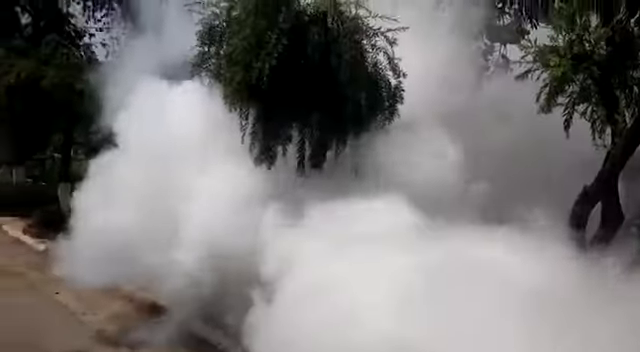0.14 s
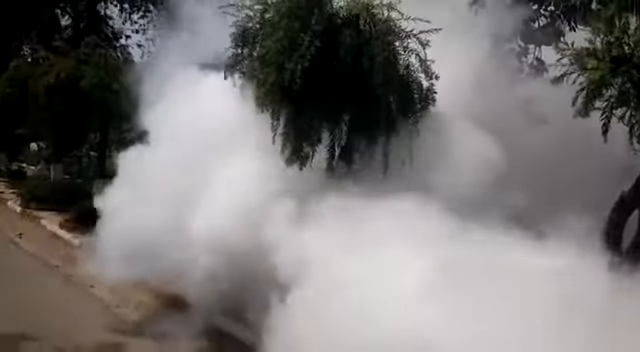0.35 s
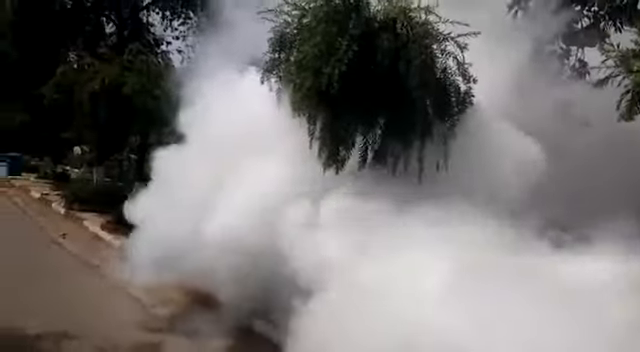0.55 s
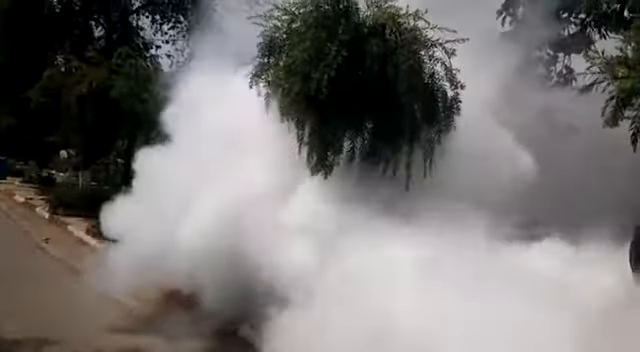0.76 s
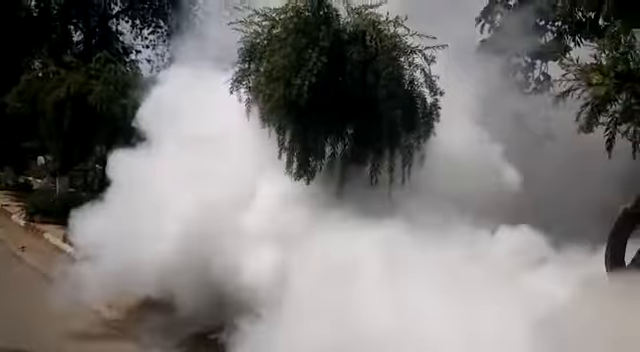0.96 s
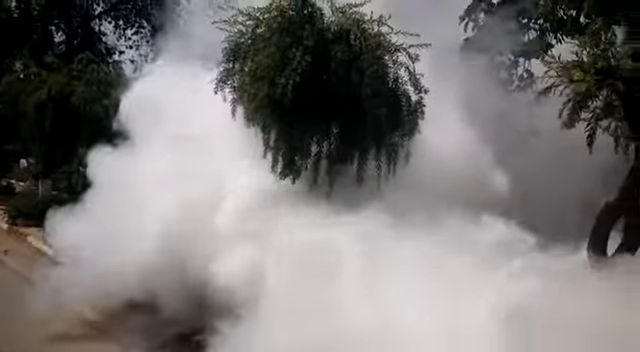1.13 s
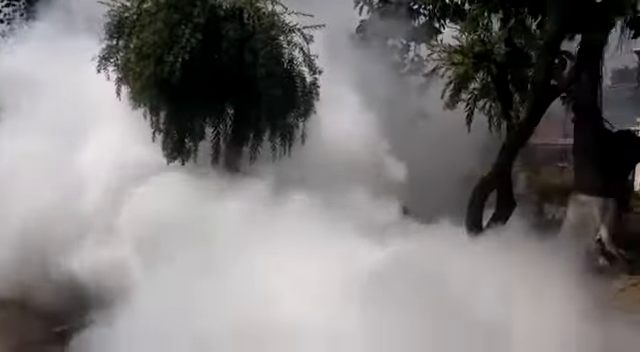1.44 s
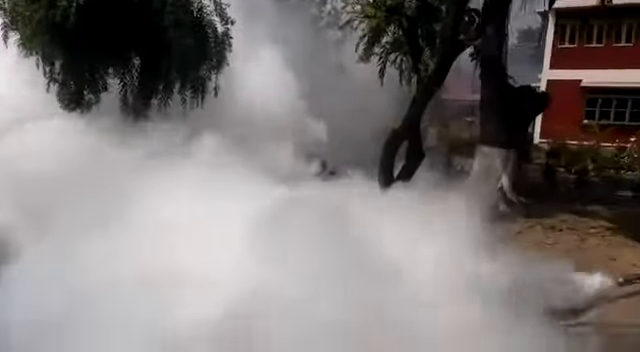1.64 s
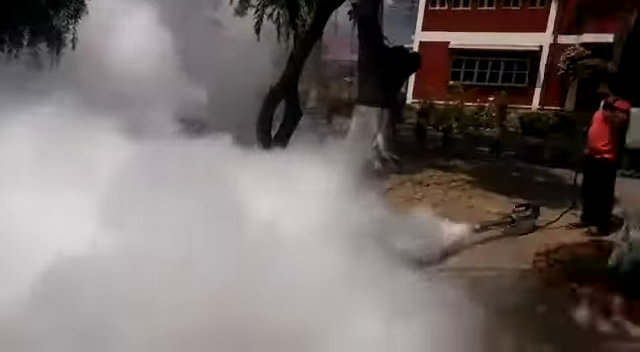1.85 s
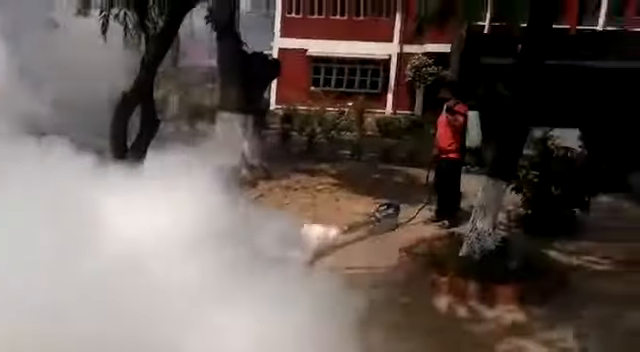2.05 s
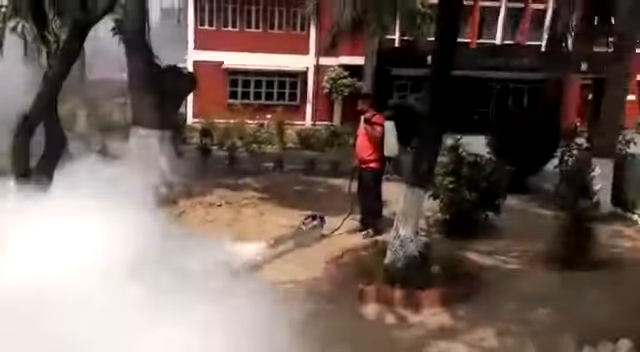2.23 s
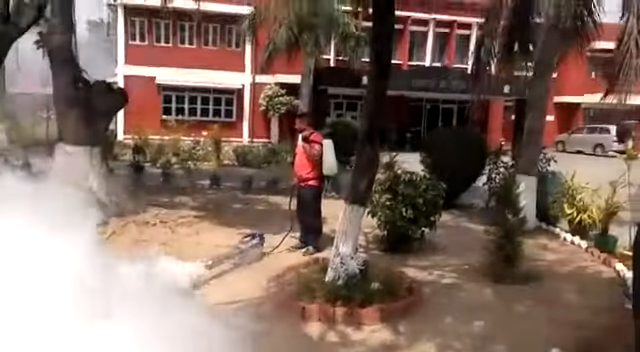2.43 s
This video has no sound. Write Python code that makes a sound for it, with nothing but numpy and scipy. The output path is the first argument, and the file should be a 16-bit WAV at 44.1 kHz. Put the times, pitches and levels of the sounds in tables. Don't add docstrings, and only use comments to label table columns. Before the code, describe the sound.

A pulse-jet fogger runs without pause some metres away in a garden, its rapid firings fusing into a rough low buzz with crackling gas and jet roar; a phone microphone catches it loud, compressed and dull on top.

```python
import sys
import numpy as np
from scipy import signal
from scipy.io import wavfile
from scipy.ndimage import uniform_filter1d, map_coordinates

SR = 44100
rng = np.random.default_rng(int(sys.argv[2]) if len(sys.argv) > 2 else 0)


def persist_wave(psi):
    counts = np.round(np.clip(psi, -1, 1) * 32767).astype(np.int16)
    wavfile.write(sys.argv[1], SR, np.atleast_2d(counts).T)


def natural_amplitude(level_db):
    exponent = np.asarray(level_db, float) / 20
    return 10 ** exponent


N = 114219


def level(x, db):
    return x * natural_amplitude(db) / np.sqrt(np.mean(x ** 2))


def band(x, hz, width_hz):
    return signal.lfilter(*signal.iirpeak(hz, hz / width_hz, fs=SR), x)


def lowpass(x, hz, order):
    run_in = 400
    x = np.concatenate([x[..., run_in:0:-1], x], -1)
    return signal.sosfilt(signal.butter(order, hz, fs=SR, output="sos"), x)[..., run_in:]


def walk(rate_hz):
    hold = int(SR / rate_hz)
    steps = np.repeat(rng.standard_normal(N // 100), hold)[:N + hold]
    return 1.3 * uniform_filter1d(uniform_filter1d(steps, hold), hold)[:N]


def control(index):
    # start_s, firing_rate_hz, bang_db, puff_facing_db, ground_lag_ms
    run = [(0, 104, -0.5, 1, .61), (0.199, 103.2, 1.5, 4.5, 0.6), (.4, 102.9, 2, 3, 0.56),
           (0.599, 103.3, -2, -4.5, .65), (0.721, 103.3, -0.5, 0, .69), (.85, 103.1, -2.5, 4.5, 0.67),
           (0.949, 103, -2, -1.5, 0.7), (1.148, 103.5, -4, 0, 0.72), (1.352, 103.9, -0.5, 1, .69),
           (1.52, 103.9, 1.5, -2, .69), (1.642, 102.4, -2.5, 0, 0.74), (1.851, 103.0, 1, -3, .62),
           (2.049, 103.7, 1, 6.5, 0.59), (2.202, 103.3, 2.5, 1, 0.54), (2.26, 105, 3.5, 4.5, .73),
           (2.451, 103.7, 2.5, 6.5, .7), (2.59, 105.2, 5.5, 6, 0.63)]
    return np.interp(np.arange(N) / SR, np.array(run)[:, 0], np.array(run)[:, index])


def firings():
    period_scatter, rate_wander, turns_per_size = 0.005, 0.003, -0.0054
    size_scatter_db, size_memory = 3.0, 0.16
    chance = rng.standard_normal((400, 4))
    even = np.cumsum(control(index=1) * (1 + rate_wander * walk(12))) / SR + 0.8
    slip = signal.lfilter([1], [1, -0.8], period_scatter * chance[:, 0] + turns_per_size * chance[:, 1])
    size_db = size_scatter_db * signal.lfilter([1], [1, -size_memory], chance[:, 1])
    return even + np.interp(even, np.arange(len(slip)), slip), size_db, chance


def roar():
    # centre_hz, level_db (per Hz)
    roar_spectrum = [(25, -47.5), (92, -32.5), (165, -25), (265, -11.5), (370, -14.5), (600, -7),
                     (1100, -18.5), (3000, -30.5)]
    roar_db, flicker_db = -24.5, 2.5
    centre_hz, spectrum_db = np.transpose(roar_spectrum)
    out = 0
    for hz in 28 * 2 ** np.arange(0, 6.8, 1 / 3):
        db = np.interp(np.log(hz), np.log(centre_hz), spectrum_db)
        noise = band(band(rng.standard_normal(N), hz, hz / 3), hz, hz / 3)
        out = out + natural_amplitude(db + flicker_db * walk(11)) * noise
    return level(out, roar_db)


def yard_wash(jet):
    t60_s, wash_db, first_return_s = 0.15, -15, 0.012
    t = np.arange(SR // 2) / SR
    tail = rng.standard_normal(len(t)) * natural_amplitude(-60 * t / t60_s) * (t > first_return_s)
    return signal.fftconvolve(jet, level(tail, wash_db) / np.sqrt(len(t)))[:N]


def ground_echo(jet):
    echo_db, band_hz = -2, [1900, 5500]
    late = np.arange(N) - control(index=4) * SR / 1000
    sos = signal.butter(1, band_hz, "band", fs=SR, output="sos")
    return -natural_amplitude(echo_db) * map_coordinates(signal.sosfiltfilt(sos, jet), [late], mode="mirror")


def column(turns, size_db):
    # multiple (of firing rate), level_db
    multiples = [(1, -12), (2, -13.5), (3, 0.5), (4, -8.5), (5, -7.5), (6, -31), (7, -6.5), (8, -8),
                 (9, -10), (10, -24)]
    follows_firing = [.3, .15, -.5, -.2, -.1, .3, 1, 1, .8, .5]
    ring_turns = [(3.5, 2.8), (6.5, 1.4)]
    column_db, wobble_db = -15, 0.63
    lead_rad, own_slip_rad = -0.5, 0.07
    mouth_slip_turns, mouth_above = 0.0072, 5.5
    strength_db = np.interp(turns, np.arange(len(size_db)), size_db) + control(index=2)
    slip = mouth_slip_turns * walk(60)
    out = 0
    for (k, db), follows in zip(multiples, follows_firing):
        lead = lead_rad + sum(rad for above, rad in ring_turns if k > above)
        gain = natural_amplitude(db + follows * strength_db + wobble_db * np.sqrt(k) * walk(30))
        own_slip = own_slip_rad * np.sqrt(k) * walk(30)
        phase = 2 * np.pi * k * (turns + slip * (k > mouth_above)) + lead + own_slip
        out = out + gain * np.cos(phase)
    return level(out, column_db)


def puff_gate(turns, at_turns):
    rise_turns, fall_turns = 0.056, 0.17
    p = (turns - at_turns) % 1
    return (1 - np.exp(-p / rise_turns)) ** 2 * np.exp(-p / fall_turns)


def puffs(turns, size_db, chance):
    # centre_hz, width_hz, level_db, bang_share (dB per dB of bang)
    gas_rings = [(619, 110, 1.5, 1.4), (903, 83, 0.5, 1.5), (1382, 220, 2, -1.6), (1694, 60, -1.5, 0.4),
                 (1985, 150, -10, 1.6), (2398, 340, -6.5, -0.3), (2696, 290, -5.5, -1.33),
                 (3406, 790, -8.5, 0.77), (4410, 630, -20, -1.8), (7540, 6000, -9, 0.4)]
    first_at_turns, second_at_turns, second_db = 0.04, 0.5, -14
    puff_db, rest_db, scatter_db = -26.5, -10.5, 1.5
    facing_hz, facing_width_hz = 3460, 620
    low_lead_turns, low_below_hz = 0.16, 1000
    cycle = np.floor(turns - first_at_turns + 0.01).astype(int) % len(size_db)
    first = puff_gate(turns, first_at_turns) * natural_amplitude(scatter_db * chance[cycle, 3] + 0.2 * size_db[cycle])
    second = natural_amplitude(second_db) * puff_gate(turns, second_at_turns)
    gate = level(first + second, 0) + natural_amplitude(rest_db)
    facing_db, bang_db = control(index=3), control(index=2)
    lead = int(low_lead_turns * N / turns[-1])
    gas = 0
    for hz, width_hz, db, bang_share in gas_rings:
        ring_gate = np.roll(gate, -lead * (hz < low_below_hz))
        noise = ring_gate * rng.standard_normal(N)
        ring = level(band(band(noise, hz, 2 * width_hz), hz, width_hz), 0)
        facing = facing_db * np.exp(-((hz - facing_hz) / facing_width_hz) ** 2)
        gas = gas + natural_amplitude(db + facing + bang_share * bang_db + 1.3 * walk(8.96)) * ring
    return level(gas, puff_db)


def bangs(turns, size_db, chance):
    # centre_hz, width_hz, level_db
    mouth_rings = [(1692, 60, 1), (1496, 140, -8.5), (3520, 160, -5.5)]
    bang_db, jitter_s, at_turns = -35.5, 0.00017, 0.12
    count = int(turns[-1])
    at = np.interp(np.arange(1, count) + at_turns, turns, np.arange(N))
    at = np.clip(at + jitter_s * SR * chance[1:count, 2], 0, N - 2)
    whole = at.astype(int)
    size = natural_amplitude(size_db[1:count])
    pulses = np.zeros(N)
    pulses[whole] = size * (1 - at + whole)
    pulses[whole + 1] = size * (at - whole)
    rings = 0
    for hz, width_hz, db in mouth_rings:
        rings = rings + natural_amplitude(db) * band(band(pulses, hz, 3 * width_hz), hz, width_hz) / width_hz
    return level(rings, bang_db) * natural_amplitude(control(index=2))


def scene():
    turns, size_db, chance = firings()
    jet = bangs(turns, size_db, chance) + puffs(turns, size_db, chance)
    return (jet + ground_echo(jet) + yard_wash(jet) + column(turns, size_db) + roar())[None]


def top_cut(x):
    return signal.sosfilt(signal.butter(12, 14255, fs=SR, output="sos"), x)


def record(dry):
    leveller_s, leveller_share, drive = 0.0088, 0.51, 0.69
    top_hz, leak_hz, leak_db = 3850, 5100, -39.5
    hiss_hz, hiss_db = 11000, -81.5
    power = uniform_filter1d(dry ** 2, int(leveller_s * SR))
    x = dry * (power / power.mean() + 0.01) ** (-leveller_share / 2)
    x = np.tanh(drive * x) / drive
    hiss = natural_amplitude(hiss_db + 1.6 * walk(100)) * lowpass(rng.standard_normal(N), hiss_hz, order=1)
    leak = natural_amplitude(leak_db) * lowpass(x, leak_hz, order=2)
    return top_cut(lowpass(x, top_hz, order=6) + leak + hiss)


dry = scene()
out = record(dry)
persist_wave(out)
```